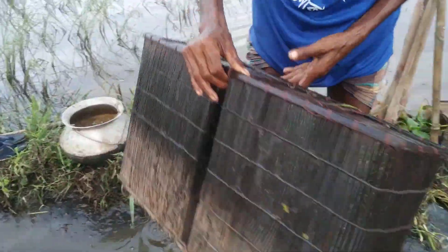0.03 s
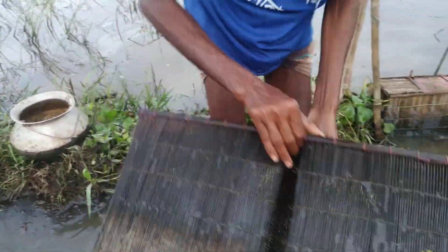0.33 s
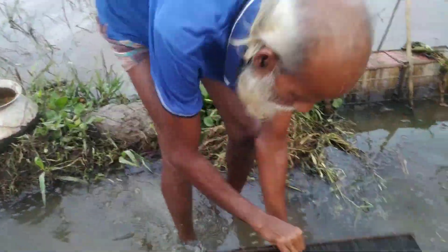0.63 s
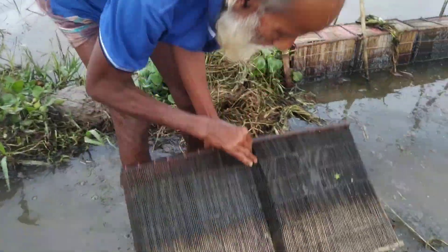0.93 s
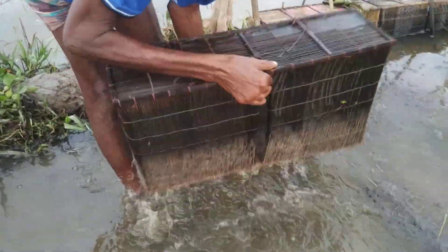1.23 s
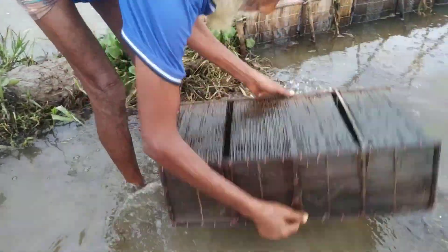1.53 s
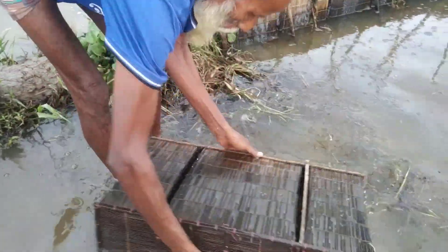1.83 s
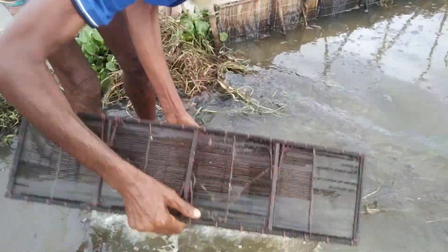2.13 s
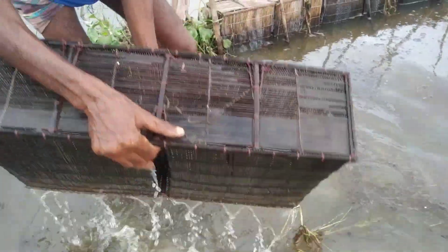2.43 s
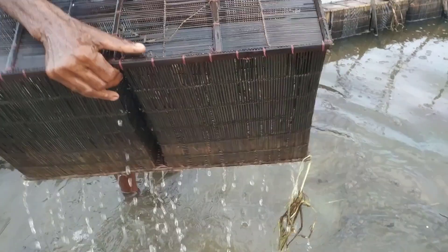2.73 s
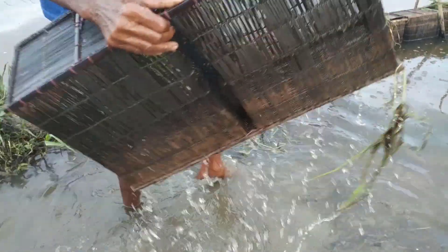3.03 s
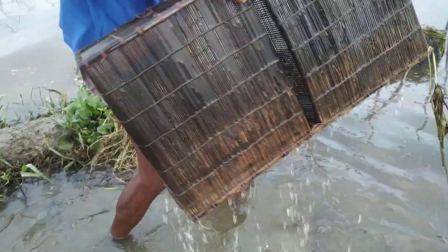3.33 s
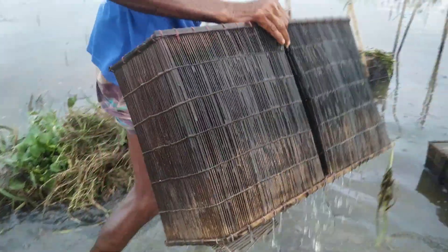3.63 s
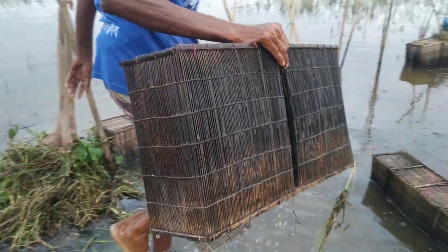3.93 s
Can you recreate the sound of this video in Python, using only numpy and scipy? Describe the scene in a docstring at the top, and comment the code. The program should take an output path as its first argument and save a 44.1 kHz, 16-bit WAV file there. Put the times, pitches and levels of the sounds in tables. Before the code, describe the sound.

Water splashes and hisses as a bamboo fish trap is plunged twice into a shallow pond, with gurgles and low glugs. It is then lifted and drains in pattering drops. Outdoors, wind rumbles on the microphone.

```python
"""Wind eddies buffet two microphone ports from the outset. Near 0.6 s a slatted bamboo fish trap is
plunged into shallow water: spray hisses through the slats and the churned water rings with bubbles.
Trapped air breaks free in low glugs around the second plunge, near 1.6 s. From about 2 s the trap is
lifted to drain: falling drops patter and splat on the pond, and the large bubbles they leave plink."""
import sys
import numpy as np
from scipy import signal
from scipy.fft import rfft, irfft, next_fast_len
from scipy.io import wavfile
from scipy.ndimage import map_coordinates

SR = 44100
rng = np.random.default_rng(int(sys.argv[2]) if len(sys.argv) > 2 else 0)


def unload_audio(sound):
    """Save the sound as a 16-bit wav file, at the path given as the first command line argument."""
    columns = np.transpose(np.atleast_2d(sound))
    # keep every value between -1 and 1, then stretch to whole-number steps
    steps = np.round(np.clip(columns, -1, 1) * 32767)
    wavfile.write(sys.argv[1], SR, steps.astype(np.int16))


N = 176400


def spray():
    """Superposition: impacts and tiny bubbles, separate in a trickle, merge into hiss in a plunge."""
    # spray and falling water: time_s, level_db
    flow = [(0.19, -48), (0.22, -39.5), (0.555, -51.5), (0.572, -17.5), (0.63, -28.5), (0.69, -24),
            (0.85, -23.5), (0.94, -34), (1.26, -31.5), (1.35, -30), (1.43, -42.5), (1.565, -42.5),
            (1.584, -24.5), (1.64, -25), (1.74, -21), (1.94, -30.5), (2.3, -29.5), (2.41, -33.5),
            (2.75, -33), (2.97, -38.5), (3.07, -31.5), (3.33, -37.5), (3.59, -32), (3.67, -38), (3.9, -31),
            (4, -33.5)]
    # treble fizz relative to the spray: time_s, level_db
    treble = [(0.25, -11), (0.58, -1.5), (0.8, -5.5), (1.3, -9.5), (1.6, -0.5), (1.66, -7.5), (1.86, -8),
              (2.3, -7.5), (3.05, -1.5), (3.9, -4.5)]
    # spectrum of the spray: frequency_hz, gain_db
    spray_colour = [(1200, -26), (1950, -18.5), (2600, 2), (4600, 1), (6200, -1), (7600, -16), (10000, -90)]
    # spectrum of the fizz: frequency_hz, gain_db
    fizz_colour = [(4500, -8), (6800, -2.5), (8500, -1), (10500, -6), (12200, -4), (16000, -11.5)]
    (level_db,), (treble_db,) = curves(flow), curves(treble)
    merge_db, merge_span_db = -21.5, 6
    hiss_share = np.clip(0.05 + 0.5 * np.exp((level_db - merge_db) / merge_span_db), 0, 1)
    impacts = crackle(scatter_db=3.8, burst_s=0.002, count=1900)
    clumps = amp(2.5 * wobble(26))
    pings = bubbles(1955, 7080, cycles=18, rise=0.05, scatter_db=5.3, count=2200, samples=600)
    ticks = bubbles(6510, 15130, cycles=41, rise=0.033, scatter_db=1.5, count=2500, samples=400)
    bands = (pings, spray_colour, level_db - 3), (ticks, fizz_colour, level_db + treble_db)
    out = np.zeros((2, N))
    for rings, colour, band_db in bands:
        hiss = unit(coloured(rng.standard_normal((2, N)), colour))
        bursts = unit(coloured(impacts * rng.standard_normal((2, N)), colour))
        drops = unit(clumps * (bursts + unit(coloured(rings, colour))))
        out += amp(band_db) * (np.sqrt(hiss_share) * hiss + np.sqrt(1 - hiss_share) * drops)
    return out


def splats():
    """Impact excitation: water hits slats and pond with a crack and a ring; high ones decay soonest."""
    # heavy drops and slaps: start_s, level_db, pitch_hz
    hits = [(0.2137, -27.5, 2080), (0.316, -23.5, 4410), (0.542, -33, 2850), (0.5663, -15, 6270),
            (0.6894, -12, 3790), (.851, -17, 2680), (1.1939, -10.5, 10140), (1.555, -22, 5970),
            (1.724, -12, 7300), (1.8498, -11.5, 3990), (2.14, -21, 3570), (2.1757, -17.5, 3690),
            (2.334, -13.5, 4470), (2.3588, -11, 7340), (2.451, -24.5, 1980), (2.493, -27, 1600),
            (2.5544, -13.5, 5930), (2.6267, -14, 3830), (2.6718, -15.5, 5970), (2.792, -26.5, 1380),
            (3.0106, -17, 8700), (3.188, -22, 3870), (3.204, -22, 2510), (3.295, -24, 6300),
            (3.5114, -34, 7740), (3.5468, -14.5, 9300), (3.7397, -19, 2530), (3.744, -11, 6470),
            (3.764, -16.5, 9600), (3.786, -17.5, 6900)]
    crack_cycles, ring_cycles = 72, 150  # periods to fall 60 dB
    log_width, attack_s = 0.48, 0.0003
    out, t = np.zeros((2, N)), np.arange(4096) / SR
    bins_hz = np.fft.rfftfreq(len(t), 1 / SR) + 1
    for start_s, level_db, pitch_hz in hits:
        band = np.exp(-.5 * (np.log(bins_hz / pitch_hz) / log_width) ** 2)
        noise = unit(irfft(rfft(rng.standard_normal((2, len(t)))) * band))
        crack = noise * amp(-2 - 60 * t * pitch_hz / crack_cycles)
        ring = np.sin(2 * np.pi * pitch_hz * t) * amp(-4.5 - 60 * t * pitch_hz / ring_cycles)
        attack = -np.expm1(-t / attack_s)
        add(out, start_s, amp(level_db) * (crack + ring) * attack)
    return out


def churn():
    """Bubble resonance: mid-sized bubbles gurgle over the noisy wash of stirred water."""
    # churned water: time_s, level_db
    stirring = [(0.17, -50.5), (0.23, -43), (0.55, -43.5), (0.69, -28.5), (0.85, -32.5), (1.02, -41.5),
                (1.22, -33.5), (1.42, -51.5), (1.6, -41), (1.735, -24), (1.86, -32.5), (2.2, -40),
                (2.8, -43), (2.96, -52.5), (3.08, -43), (3.35, -47.5), (3.69, -45), (3.87, -37.5)]
    # spectrum of gurgle and wash: frequency_hz, gain_db
    colour = [(250, -26.5), (450, -5), (700, -5), (1100, -0.5), (1500, 5.5), (1900, 0.5), (2500, 4),
              (9000, -94)]
    level_db, = curves(stirring)
    cloud = bubbles(494.3, 2235, cycles=10, rise=0.08, scatter_db=3.4, count=750, samples=2400)
    gurgle = unit(coloured(cloud, colour))
    noise = rng.standard_normal(N) + .5 * rng.standard_normal((2, N))  # mostly common to both ports
    wash = unit(coloured(noise * crackle(scatter_db=1.0, burst_s=0.0023, count=1400), colour))
    wash_db = 3.0 + 0.11 * (level_db - level_db.mean())
    return amp(level_db - 0.5) * unit(gurgle + amp(wash_db) * wash)


def glugs():
    """Resonance falls with size: air caught by the moving trap breaks free as big, low bubbles."""
    # releases of air: centre_s, level_db
    releases = [(1.255, -31), (1.325, -31), (1.47, -28), (1.518, -28), (1.695, -25), (1.748, -20.5)]
    envelope = sum(amp(db) * swell(centre_s, width_s=0.013) for centre_s, db in releases)
    return envelope * bubbles(252, 492, cycles=10.2, rise=0.054, scatter_db=-0.5, count=900, samples=2400)


def plinks():
    """A large bubble's resonance slides unsteadily upward as it nears the surface."""
    # bubbles left by drops: start_s, pitch_hz, level_db, life_s
    large_bubbles = [(2.37, 520, -33, .05), (2.528, 740, -30, .03), (2.702, 660, -31, .05),
                     (2.822, 880, -32, .028), (3.12, 490, -29.5, .042), (3.73, 410, -35, .05),
                     (3.864, 980, -24, .012)]
    rise, waver, attack_s = 0.51, 0.06, 0.0013  # rise over one life and waver are shares of the pitch
    out, t = np.zeros((2, N)), np.arange(N) / SR
    for start_s, pitch_hz, level_db, life_s in large_bubbles:
        age = t / life_s
        glide_hz = pitch_hz * (1 + rise * np.minimum(age, 1.3) ** 2 + waver * wobble(300))
        attack = -np.expm1(-t / attack_s)
        envelope = amp(level_db - 15 * age ** 2 + 2 * wobble(200)) * attack
        add(out, start_s, envelope * np.sin(2 * np.pi * np.cumsum(glide_hz) / SR))
    return out


def wind():
    """Turbulent pressure: eddies hit each port separately, a deep rumble under a lumpy flutter."""
    # rumble on the ports: time_s, level_db, left_minus_right_db
    breeze = [(0, -27.5, -7.5), (.55, -30.5, -12), (.8, -24.5, -14), (1.75, -25.5, -16), (2.05, -32.5, -12),
              (2.9, -33, -1), (3.35, -33.5, -6.5), (3.8, -30.5, 8.5), (4, -44.5, 7)]
    # upper flutter: time_s, level_db
    flutter_levels = [(0.15, -50.5), (0.22, -30.5), (0.5, -50), (0.75, -32), (1.08, -36.5), (1.25, -30.5),
                      (1.41, -32), (1.5, -29.5), (1.74, -27.5), (2.0, -44.5), (4, -52)]
    # single buffets: centre_s, boost_db
    gusts = [(0.138, 6.5), (1.186, 8), (1.327, 10.5), (1.475, 9.5), (1.663, 15), (2.325, 7), (3.539, 13.5),
             (3.646, 10.5)]
    # spectrum of the rumble: frequency_hz, gain_db
    rumble_colour = [(25, 0.5), (85, -0.5), (160, -7), (240, -18), (3000, -110)]
    # spectrum of the flutter: frequency_hz, gain_db
    flutter_colour = [(90, -16), (170, 1.5), (270, -2), (430, -11.5), (5000, -110)]
    rumble_db, lean_db = curves(breeze)
    flutter_db, = curves(flutter_levels)
    gust_db = sum(db * swell(centre_s, width_s=0.012) for centre_s, db in gusts)
    pan = amp(np.array([lean_db, -lean_db]) / 2)
    pan *= np.sqrt(2 / np.sum(pan ** 2, 0))  # constant power
    rumble = unit(coloured(rng.standard_normal((2, N)), rumble_colour) * amp(2.2 * wobble(25.17)))
    flutter = unit(coloured(rng.standard_normal((2, N)), flutter_colour) * amp(4.6 * wobble(27.92)))
    rumble *= amp(rumble_db + gust_db + 1.66)
    flutter *= amp(flutter_db + 0.57 * gust_db - 0.5)
    return pan * (rumble + flutter)


def bubbles(low_hz, high_hz, cycles, rise, scatter_db, count, samples):
    """Damped oscillators: a cloud of bubbles rings and rises in pitch, each from its own direction."""
    pitch_draw, gain_draw, onset_draw = rng.random((count, 3)).T[..., None]
    life_draw, delay_draw, pan_draw = rng.standard_normal((count, 3)).T[..., None]
    pitch_hz = low_hz * (high_hz / low_hz) ** pitch_draw
    life_s = np.minimum(cycles * np.exp(.5 * life_draw) / pitch_hz, samples / SR / 2)
    gain = amp(-scatter_db * np.log(gain_draw + .02))
    index = (onset_draw * N).astype(int) + np.arange(samples)
    spread_s = 0.000114  # scatter of arrival times between the ports
    pair = []
    for side in (-1, 1):
        t = np.maximum(np.arange(samples) / SR - spread_s * (2 + side * delay_draw / 2), 0)
        age = t / life_s
        envelope = gain * amp(side * 2.0 * pan_draw) * np.exp(-2 * age)
        ring = envelope * np.sin(2 * np.pi * pitch_hz * t * (1 + rise * age / 2))
        pair.append(np.bincount(index.ravel(), ring.ravel())[:N])
    return unit(np.array(pair))


def crackle(scatter_db, burst_s, count):
    """Incoherent addition: the envelope of bursting drops, whose decaying powers sum."""
    onset_draw, gain_draw = rng.random((count, 2)).T
    gain = amp(-scatter_db * np.log(gain_draw + .015))
    power = np.bincount((onset_draw * N).astype(int), gain ** 2, N)
    decay = np.exp(-1 / (burst_s * SR))
    return np.sqrt(signal.lfilter([1], [1, -decay], power))


def ports(water):
    """Frequency response: each port gives the water its own colour and phase."""
    # balance of the ports: frequency_hz, left_minus_right_db
    balance = [(400, 5.5), (750, -2.5), (1700, -2.5), (2400, -1.5), (3200, 12.5), (6200, 2.5), (9600, -1),
               (11500, -6.5), (15000, -1.5)]
    # phase between the ports: frequency_hz, left_lead_rad
    phase = [(1000, 0.25), (1200, 2.5), (1450, -0.95), (2000, -1.74), (2700, 0.6)]
    centre_db = lambda db: 10 * np.log10((amp(db) + amp(-db)) / 2)
    left = coloured(water[0], [(hz, db / 2 - centre_db(db)) for hz, db in balance])
    right = coloured(water[1], [(hz, -db / 2 - centre_db(db)) for hz, db in balance])
    lead_rad = along(phase, np.fft.rfftfreq(N, 1 / SR))
    left = irfft(rfft(left) * np.exp(1j * lead_rad), N)
    return np.array([left, right])


def coloured(x, points):
    """Minimum-phase filter through (frequency_hz, gain_db) points."""
    size = 2 * next_fast_len(N // 2 + 8192)
    gain = amp(along(points, np.fft.rfftfreq(size, 1 / SR)))
    cepstrum = irfft(np.log(gain), size)
    cepstrum[1:size // 2] *= 2  # folding onto positive time makes the filter causal
    cepstrum[size // 2 + 1:] = 0
    return irfft(rfft(x, size) * np.exp(rfft(cepstrum)), size)[..., :N]


def amp(db):
    """Decibels to gain."""
    return 10 ** (np.asarray(db) / 20)


def unit(x):
    """Scale a stereo pair so that its centre has rms 1."""
    return x / np.sqrt(np.mean(x.mean(0) ** 2) + 1e-20)


def along(points, hz):
    """Interpolate (frequency_hz, value) points on a log axis."""
    knots_hz, values = np.transpose(points)
    return np.interp(np.log(hz + 1), np.log(knots_hz + 1), values)


def curves(rows):
    """One value per sample for each column after the time."""
    time_s, *columns = np.transpose(rows)
    return [np.interp(np.arange(N) / SR, time_s, column) for column in columns]


def wobble(knots_per_s):
    """A smooth random curve."""
    return map_coordinates(rng.standard_normal(2048), [np.arange(N) * knots_per_s / SR], mode="mirror")


def swell(centre_s, width_s):
    """A Gaussian rise and fall."""
    return np.exp(-.5 * ((np.arange(N) / SR - centre_s) / width_s) ** 2)


def add(track, start_s, sound):
    """Mix a sound into the track."""
    part = track[:, round(start_s * SR):][:, :sound.shape[-1]]
    part += sound[..., :part.shape[1]]


def scene():
    """Superposition: the water, heard through the ports, adds to the wind upon them."""
    water = spray() + churn() + glugs() + plinks() + splats()
    return ports(water) + wind()


def record(dry):
    """Soft saturation rounds off the hardest buffets; a band limit removes the top treble."""
    ceiling, top_hz = .85, 16000
    rounded = dry / (1 + (dry / ceiling) ** 6) ** (1 / 6)
    size = next_fast_len(N + 8192)
    passband = np.fft.rfftfreq(size, 1 / SR) < top_hz
    return irfft(rfft(rounded, size) * passband, size)[:, :N]


dry = scene()
out = record(dry)
unload_audio(out)
```